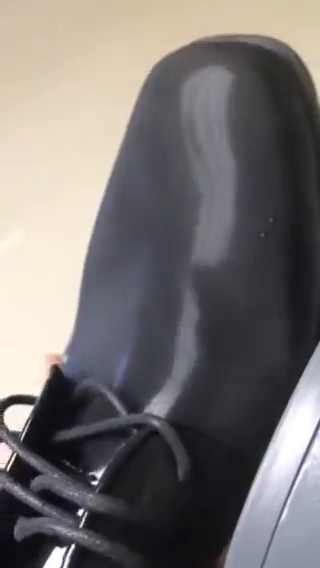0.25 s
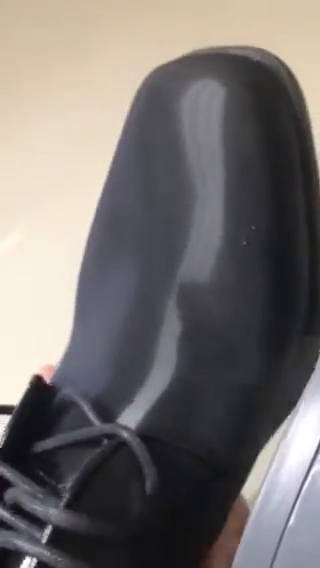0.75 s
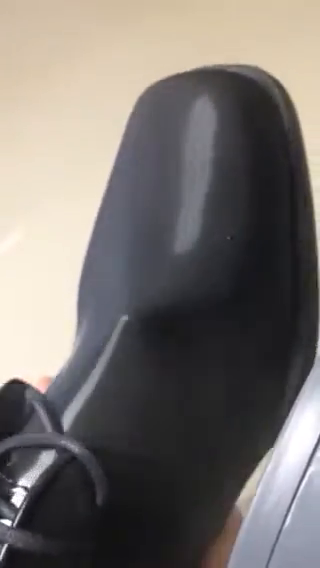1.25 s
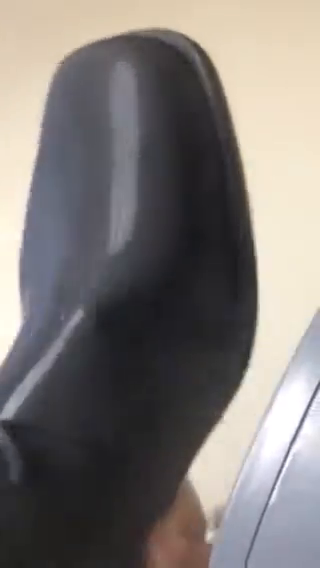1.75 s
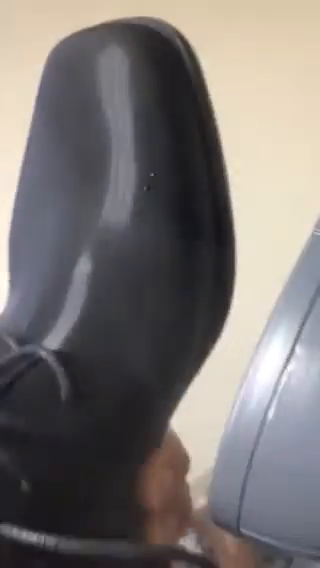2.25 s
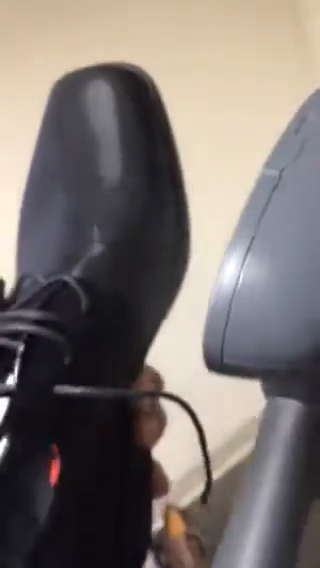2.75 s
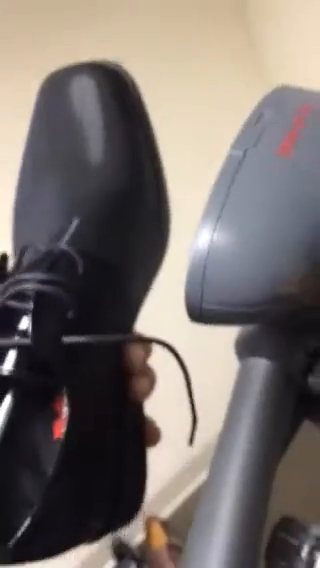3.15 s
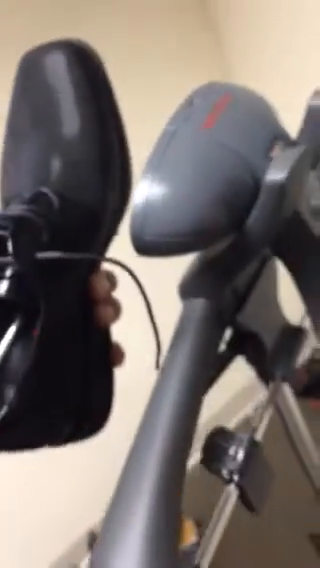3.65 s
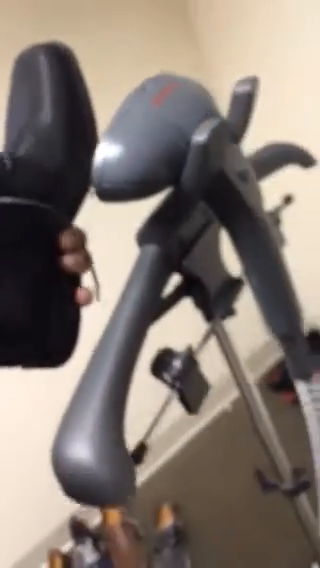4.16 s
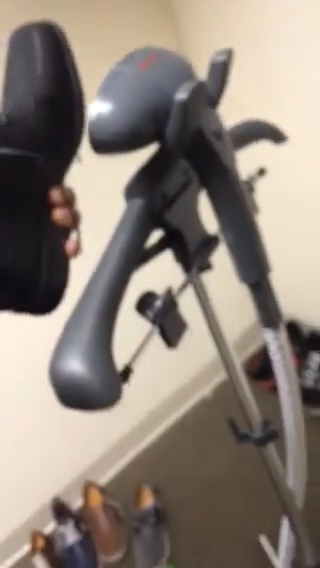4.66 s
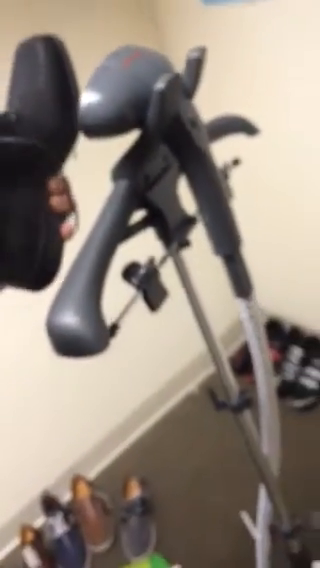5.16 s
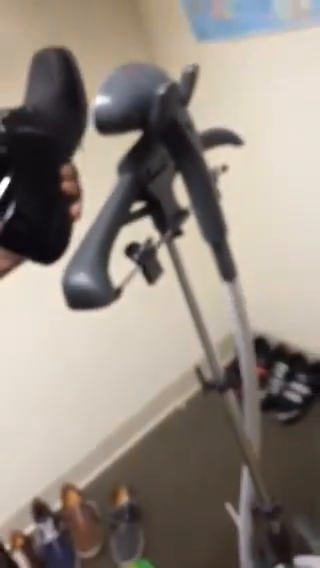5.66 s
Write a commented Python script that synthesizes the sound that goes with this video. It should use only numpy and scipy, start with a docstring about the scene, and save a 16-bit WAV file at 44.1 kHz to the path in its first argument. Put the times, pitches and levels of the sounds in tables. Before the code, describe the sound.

Wet steam rushes against a leather shoe with crackling spits and airy high whistling, growing quieter and more roomy as the microphone backs away.

```python
"""Small room, microphone a hand's width from a garment steamer blowing at a leather shoe.
At first wet steam sputters in the hollow head, surges and spits drops, while the jets hiss, splash on
the leather and catch in short breathy whistles: shaped noise, gliding resonances and short pulses.
Midway the shoe is drawn aside and screens the head for a moment. The microphone backs away, faster
towards the end, and the walls colour the steam. A small pump, a sum of harmonics, throbs underneath."""
import sys
import numpy as np
from scipy import signal
from scipy.fft import rfft, irfft, next_fast_len
from scipy.io import wavfile
from scipy.ndimage import uniform_filter1d, map_coordinates

SR = 44100
rng = np.random.default_rng(int(sys.argv[2]) if len(sys.argv) > 2 else 0)


def to_wav(s):
    """Save 16-bit WAV."""
    ch = np.atleast_2d(s).T  # columns
    pcm = np.round(np.clip(ch, -1, 1) * 32767)  # PCM
    wavfile.write(sys.argv[1], SR, pcm.astype(np.int16))


N = 261072

# Low rush, sputter and throat hiss of the head. Each row: frequency in Hz, relative level in dB.
RUSH_SPECTRUM = [(20, -42), (36, -33), (65, -8), (110, -5), (195, 2.5), (225, 0.5), (255, -6), (320, -1),
                 (420, -3.5), (560, 5.5), (750, -0.5), (1000, -6.5), (1600, -33)]
SPUTTER_SPECTRUM = [(500, -52), (780, -16), (930, -3), (1150, -5), (1400, 1), (1700, 1), (1900, 0),
                    (2100, -25), (2700, -54)]
THROAT_SPECTRUM = [(1700, -29.5), (2050, 3), (2450, 3), (3000, 2), (3500, 3), (3900, -1.5), (4150, -6),
                   (4700, -8)]
# How loud each stands at NEAR_M, before the room: level in dB, loss per doubling of distance in dB.
RUSH_LEVEL = (-52.5, 5)
SPUTTER_LEVEL = (-43, 6.5)
THROAT_LEVEL = (-39, 9.5)
# The room carries the throat's hiss at this base level however far the microphone goes.
THROAT_ROOM_DB = -58
# The hiss ends at a sharp upper edge. Each row: time in seconds, edge in Hz.
THROAT_EDGE = [(0, 4700), (.8, 4400), (1.4, 4380), (5.92, 4330)]
# The hollow note of the head. Each row: time in seconds, centre in Hz, base level in dB.
HOLLOW_NOTE = [(0, 1609, -52), (1.4, 1460, -49), (3.1, 1279, -56.5), (3.8, 1406, -49.5), (3.98, 1720, -52),
               (5.0, 1830, -50), (5.45, 2082, -57), (5.92, 2137, -66)]
# The throat's bright note sinks and fades as the head turns away.
# Each row: time in seconds, centre in Hz, base level in dB.
THROAT_NOTE = [(0, 3740, -50), (1.2, 3504, -53), (2.6, 3390, -72)]
# Narrow resonances of the plastic head. Each row: frequency in Hz, width in Hz, lift in dB.
HEAD_RESONANCES = [(397, 27, 5.5), (587, 60, -2), (690, 67, 1.5), (1106, 33, 4), (1170, 64, 4.5),
                   (1227, 45, 4), (1420, 48, 3), (1643, 65, 2.5), (2076, 150, 3)]
# The shoe passes between head and microphone: half-way in and half-way out in seconds, fade in seconds.
SHOE_SCREEN = (2.62, 3.26, 0.49)


def head(throat_surge=0.48, throat_screen_db=6):
    """Condensed water sputters in the steam path and rings the hollow head; the shoe screens its throat hiss."""
    surge_db = surging()
    screen = spell(*SHOE_SCREEN)
    # the same droplets and surges drive both low registers
    flicker = amp(0.97 * wobble(30))
    flow = wet_flow(per_second=300, spread_db=3, drop_share=0.33) * flicker
    rush = heard(RUSH_LEVEL, surge_db) * coloured(flow, RUSH_SPECTRUM)
    sputter = heard(SPUTTER_LEVEL, surge_db) * coloured(flow, SPUTTER_SPECTRUM)
    fine_flow = wet_flow(per_second=900, spread_db=-6.5, drop_share=0.16)
    direct = heard(THROAT_LEVEL, -throat_screen_db * screen)
    throat_gain = np.hypot(direct, amp(THROAT_ROOM_DB)) * amp(throat_surge * surge_db)
    throat = below_edge(throat_gain * coloured(fine_flow, THROAT_SPECTRUM), THROAT_EDGE)
    notes = gliding_note(HOLLOW_NOTE, width_hz=123) + gliding_note(THROAT_NOTE, width_hz=300)
    return resonant(rush + sputter + throat + notes, HEAD_RESONANCES)


# Surges of condensed water in the steam path.
# Each row: middle in seconds, length in seconds, lift in dB.
WATER_SURGES = [(1.26, 0.12, 1), (1.52, 0.55, 1.5), (2.047, 0.2, 3.5), (2.206, 0.14, 3), (2.61, 0.25, 3),
                (3.759, 0.19, 4.5), (4.3, 0.077, 1.5), (4.847, .06, 6), (4.993, 0.12, 4), (5.465, 0.13, 5),
                (5.621, 0.19, 3.5), (5.75, .07, 3)]


def surging():
    """Lift in dB from the surges of water, each a smooth swell."""
    t = np.arange(N) / SR
    return sum(db * np.exp(-(2 * (t - s) / length) ** 2) for s, length, db in WATER_SURGES)


def wet_flow(per_second, spread_db, drop_share):
    """Turbulence mixed with tiny bursting droplets of uneven size, drop_share of the power."""
    draws = rng.random(N)
    sizes = amp(spread_db * rng.uniform(-0.8, 1, N))
    share = np.clip(drop_share, 0, 1)
    droplets = unit((draws < per_second / SR) * sizes)
    turbulence = rng.standard_normal(N)
    return np.sqrt(share) * droplets + np.sqrt(1 - share) * turbulence


# Splash on the leather, hiss and fine mist. Each row: frequency in Hz, relative level in dB.
SPLASH_SPECTRUM = [(3600, -8.5), (4400, 1.5), (5000, 1.5), (6100, 1.5), (7000, -5), (9500, -11.5),
                   (12000, -37)]
HISS_SPECTRUM = [(5200, -24), (6500, -5), (7300, 0.5), (8300, 0), (9800, 1.5), (12000, -5), (13500, -17)]
MIST_SPECTRUM = [(9000, -20.5), (12000, -8), (13000, -10), (14300, -8), (15500, -13.5)]
# How loud each stands at NEAR_M, before the room: level in dB, loss per doubling of distance in dB.
SPLASH_LEVEL = (-51, 2.5)
HISS_LEVEL = (-47, 4.5)
MIST_LEVEL = (-46.5, 4)
# The jets strike the leather. Each row: start in seconds, end in seconds,
# lift of the splash in dB, of the hiss in dB, of the mist in dB.
LEATHER_STRIKES = [(.25, 1.24, 0, -0.5, 2.5), (1.23, 1.796, 7, 2, 1.5), (1.775, 2.355, 4.5, 4.5, 2.5),
                   (2.34, 2.715, 6, 4, 2.5), (2.72, 3.352, 3.5, 0.5, 3)]
STRIKE_FADE_S = 0.16
# The jets' airy edge tone glides, swells and fades as the shoe moves before the holes.
# Each row: time in seconds, centre in Hz, base level in dB.
EDGE_TONE = [(0, 11070, -47.5), (.55, 11250, -42.5), (1.17, 10610, -42), (1.35, 10640, -46),
             (1.62, 10700, -39.5), (1.8, 11000, -47), (1.95, 11000, -48), (2.15, 11000, -60),
             (2.65, 10950, -43.5), (3.05, 10470, -44), (3.28, 10700, -44.5), (3.4, 10740, -47),
             (3.64, 10900, -46.5), (3.88, 10900, -61), (4.15, 10900, -52.5), (4.68, 11080, -50),
             (4.88, 11030, -56.5), (5.15, 11000, -54), (5.5, 11060, -64)]
# Their lower, broader tone opens as the shoe clears the head.
# Each row: time in seconds, centre in Hz, base level in dB.
LOW_TONE = [(0, 7300, -60), (2.9, 6300, -53), (3.18, 6900, -59), (3.35, 7200, -50), (3.75, 7450, -49),
            (4.15, 7200, -56), (4.6, 6800, -59), (5.92, 7450, -58.5)]


def jets():
    """The jets hiss, splash on the leather and whistle at the edges of their holes."""
    splash_db, hiss_db, mist_db = sum(
        np.outer(lifts, spell(start, end, STRIKE_FADE_S)) for start, end, *lifts in LEATHER_STRIKES)
    splash = heard(SPLASH_LEVEL, splash_db) * coloured(rng.standard_normal(N), SPLASH_SPECTRUM)
    hiss = heard(HISS_LEVEL, hiss_db) * coloured(rng.standard_normal(N), HISS_SPECTRUM)
    mist = heard(MIST_LEVEL, mist_db) * coloured(rng.standard_normal(N), MIST_SPECTRUM)
    tones = gliding_note(EDGE_TONE, width_hz=480) + gliding_note(LOW_TONE, width_hz=680)
    flutter = amp(0.46 * wobble(21.93))
    return (splash + hiss + mist + tones + whistles()) * flutter


# A jet catches on the edge of its hole and whistles. Each row: start in seconds, end in seconds,
# pitch at the middle in Hz, glide in Hz per second, base level in dB.
JET_WHISTLES = [(1.257, 1.8, 12060, -150, -47.5), (2.283, 2.52, 12150, -3000, -48),
                (3.222, 4.016, 11900, 397.5, -54.5), (5.7, 6.1, 11700, 0, -60)]
WHISTLE_WIDTH_HZ, WHISTLE_FADE_S = 400, 0.043


def whistles():
    """Brief high whistles catch on the hole edges, hold or slide in pitch, and let go."""
    t = np.arange(N) / SR
    out = np.zeros(N)
    for start, end, hz, glide, db in JET_WHISTLES:
        pitch = hz + glide * (t - (start + end) / 2)
        envelope = amp(db) * np.sqrt(spell(start, end, WHISTLE_FADE_S))
        out += envelope * breathy_note(pitch, WHISTLE_WIDTH_HZ)
    return out


# Drops of water spat out of the holes. Each row: middle in seconds, base level in dB, pitch in Hz.
SPAT_DROPS = [(.059, -22.5, 1270), (.230, -19.5, 1140), (.413, -23.5, 1350), (.421, -36.5, 318),
              (.613, -18, 1360), (.717, -21, 1400), (.722, -41, 300), (.956, -21, 1460),
              (.998, -21.5, 1160), (1.110, -21.5, 1270), (1.231, -19.5, 1200), (1.258, -27, 1400),
              (1.273, -21.5, 1350), (1.312, -25, 1320), (1.444, -19, 1310), (1.535, -20, 1280),
              (1.665, -27.5, 896), (1.988, -30, 500), (2.025, -24, 1150), (2.232, -22, 1060),
              (2.484, -27, 1420), (2.5353, -18.5, 1140), (2.554, -39, 1300), (2.611, -27, 566),
              (2.653, -25, 1100), (2.785, -32, 1270), (2.910, -27, 1180), (3.104, -28, 1100),
              (3.117, -27, 1150), (3.530, -33, 1270), (3.704, -29, 1260), (3.764, -34, 1340),
              (3.879, -28.5, 955), (3.897, -28.5, 1210), (3.988, -33.5, 745), (4.280, -33, 1450),
              (4.306, -31, 1460), (4.946, -30, 1440), (5.469, -33, 1150), (5.672, -35, 1050)]


def spits(cycles=0.36, lean=0.59, ring_db=-15, ring_t60=0.038):
    """A drop bursts out of a hole: one push of pressure, a smaller pull and a brief ring."""
    out = np.zeros(N + SR)
    t = np.arange(-SR // 100, SR // 100) / SR  # the ring is cut off 10 ms after the push
    for s, db, hz in list(SPAT_DROPS) + random_drops():
        push = np.exp(-.5 * (t * hz / cycles) ** 2)
        ring = (t > 0) * amp(ring_db - 60 * np.abs(t) / ring_t60)
        burst = np.maximum(push, ring) * np.cos(2 * np.pi * hz * t + lean)
        start = round(s * SR) - len(t) // 2
        out[start:start + len(t)] += amp(db) * burst
    return out[:N]


# Further drops fall at random; their level is the one at NEAR_M.
DROPS_PER_S, DROP_DB, DROP_SPREAD_DB, DROP_HZ = 8.9, -33, -0.5, 1300


def random_drops(pitch_spread=0.46):
    """Random drops, fainter with distance: rows of seconds, level in dB, pitch in Hz."""
    count = int(DROPS_PER_S * N / SR)
    times = rng.uniform(0.022, N / SR - .02, count)
    size, pitch = rng.uniform(-1, 1, (count, 2)).T
    far_db = 20 * np.log10(np.interp(times, *np.transpose(MIC_DISTANCE)) / NEAR_M)
    levels = DROP_DB + DROP_SPREAD_DB * size - far_db
    return list(zip(times, levels, DROP_HZ * np.exp(pitch_spread * pitch)))


# Thin singing of the steam pipe. Each row: frequency in Hz, relative level in dB.
PIPE_TONES = [(3200, -3), (3440, -3.5), (3770, -0.5)]
# How loud it stands at NEAR_M: level in dB, loss per doubling of distance in dB.
SINGING_LEVEL = (-52.5, 3.5)


def singing(width_hz=40, screen_db=11, waver_hz=16, waver_db=1.5):
    """Steam in the pipe keeps narrow resonances alive, wavering in pitch and strength; the shoe screens them."""
    ring = np.zeros(N)
    for hz, db in PIPE_TONES:
        strength = amp(db + waver_db * wobble(5.14))
        ring += strength * breathy_note(hz + waver_hz * wobble(4), width_hz)
    return heard(SINGING_LEVEL, -screen_db * spell(*SHOE_SCREEN)) * unit(ring)


# A dip slides through the hiss as the shoe moves.
# Each row: time in seconds, centre in Hz, depth in dB (negative lifts).
SHOE_DIP = [(0, 5230, 3.5), (1.05, 4900, 3.5), (1.45, 4200, 4.5), (2.4, 4100, 3), (3.1, 3650, -1),
            (3.35, 4830, 4.5), (3.62, 5120, 6.5), (4.1, 5330, 3.5), (4.5, 5130, -0.5), (5.92, 5380, 6)]
# A narrower dip lower down climbs as the microphone backs away.
# Each row: time in seconds, centre in Hz, depth in dB.
LOW_DIP = [(0, 2300, 3), (2.6, 2000, 0), (3.4, 2200, 2), (3.9, 2380, 7), (4.7, 2910, 6), (5.2, 3250, 9),
           (5.7, 3730, 0)]


def drifting(x, patchy_db=1.5, dip_width_hz=450, low_dip_width_hz=270):
    """The colour of the steam shifts in soft patches and two sliding dips."""
    hz, t, z = signal.stft(x, SR, nperseg=512)
    field = rng.standard_normal(z.shape)
    field = uniform_filter1d(field, size=3, axis=0)
    field = uniform_filter1d(field, size=60, axis=1)
    # the patches reach full depth from 2 kHz up
    patches = patchy_db * unit(field) * np.clip(hz / 2000, 0, 1)[:, None]

    def dip(rows, width_hz):
        """Depth in dB of a bell-shaped dip, per frequency and time."""
        s, centre, depth = np.transpose(rows)
        offset = hz[:, None] - np.interp(t, s, centre)
        return np.interp(t, s, depth) * np.exp(-(offset / width_hz) ** 2)

    dips = dip(SHOE_DIP, dip_width_hz) + dip(LOW_DIP, low_dip_width_hz)
    return signal.istft(z * amp(patches - dips), SR, nperseg=512)[1][:N]


# Pump harmonics. Each row: multiple of the stroke rate, relative level in dB.
PUMP_HARMONICS = [(8, -15), (9, -4), (10, 0), (11, -10), (12, -5), (13, -6), (14, -9), (15, -10), (18, -16),
                  (24, -16)]
STROKE_HZ = 15
# The pump stands on the floor, so it grows as the microphone backs away; its level is the one at NEAR_M.
PUMP_DB, PUMP_GAIN_DB_PER_DOUBLING = -66, 3


def pump(first_s=.055, uneven_db=4.0, lag=0.31):
    """Regular piston strokes make a hum that throbs once a stroke."""
    turns = 2 * np.pi * STROKE_HZ * (np.arange(N) / SR - first_s)
    hum = np.zeros(N)
    for k, db in PUMP_HARMONICS:
        strength = amp(db + uneven_db * wobble(8.8))
        # the housing delays each harmonic a little differently
        hum += strength * np.cos(k * turns + lag * rng.standard_normal())
    return amp(PUMP_DB + PUMP_GAIN_DB_PER_DOUBLING * doublings()) * unit(hum)


# Peaks and notches that the walls add from afar. Each row: frequency in Hz, width in Hz, lift in dB.
WALL_RESONANCES = [(477, 43, -5.5), (630, 63, -17), (720, 126, 5.5), (1063, 34, 7), (1139, 62, -10),
                   (1250, 34, 7), (2890, 110, 8), (2355, 42, 8), (3100, 69, 6), (4100, 250, 5)]
WALLS_FROM_M, WALLS_FULL_M = 0.26, 0.64


def walls(x):
    """The further the microphone, the more the walls colour the steam."""
    share = np.clip((curves(MIC_DISTANCE)[0] - WALLS_FROM_M) / (WALLS_FULL_M - WALLS_FROM_M), 0, 1)
    return (1 - share) * x + share * resonant(x, WALL_RESONANCES)


def room(x, t60, wet_db, wet_db_per_doubling):
    """Near walls add a short, dense answer whose share grows with distance."""
    t = np.arange(SR // 2) / SR
    tail = rng.standard_normal(len(t)) * amp(-60 * t / t60) * (t > .003)
    wet = signal.fftconvolve(x, tail / np.linalg.norm(tail))[:N]
    share = amp(wet_db + wet_db_per_doubling * doublings())
    return (x + share * wet) / np.sqrt(1 + share ** 2)


# The quiet room itself. Each row: frequency in Hz, relative level in dB.
ROOM_SPECTRUM = [(22, -40), (38, -2), (65, -1), (105, -4), (195, 8), (255, -5), (480, -7), (800, 2),
                 (2000, -17), (15000, -20)]


def room_floor():
    """The steady noise of the room, random and shaped in frequency."""
    return amp(-64.0) * coloured(rng.standard_normal(N), ROOM_SPECTRUM)


# Microphone to nozzle. Each row: time in seconds, distance in metres.
MIC_DISTANCE = [(0, 0.16), (2.35, 0.23), (2.95, 0.31), (3.75, 0.41), (4.2, 0.46), (5.0, 0.68), (5.92, 0.82)]
NEAR_M = .2


def doublings():
    """How many times the distance to the nozzle has doubled from NEAR_M, per sample."""
    return np.log2(curves(MIC_DISTANCE)[0] / NEAR_M)


def heard(level, lift_db=0):
    """Gain over time of a part given as (near dB, loss per doubling dB)."""
    near_db, loss_db = level
    return amp(near_db - loss_db * doublings() + lift_db)


def spell(start, end, fade):
    """Fades in around start, holds at 1, fades out around end."""
    t = np.arange(N) / SR
    return np.clip(np.minimum(t - start, end - t) / fade + .5, 0, 1)


def breathy_note(centre_hz, width_hz):
    """Turbulence in one resonance whose centre glides."""
    def narrow(hz):
        return 1 / np.sqrt(1 + (hz / width_hz) ** 4)

    a, b = [filtered(noise, narrow) for noise in rng.standard_normal((2, N))]
    phase = 2 * np.pi * np.cumsum(centre_hz) / SR
    return unit(a * np.cos(phase) + b * np.sin(phase))


def gliding_note(rows, width_hz):
    """A breathy note that follows (s, centre Hz, level dB) rows."""
    centre_hz, db = curves(rows)
    return amp(db) * breathy_note(centre_hz, width_hz)


def resonant(x, bands):
    """x with narrow (Hz, width Hz, lift dB) peaks and notches."""
    def response(hz):
        return amp(sum(db / (1 + (2 * (hz - f) / w) ** 2) for f, w, db in bands))

    return filtered(x, response)


def below_edge(x, rows, width_hz=70):
    """x with everything above a sliding (s, Hz) edge cut away."""
    hz, t, z = signal.stft(x, SR, nperseg=512)
    edge = np.interp(t, *np.transpose(rows))
    keep = (1 - np.tanh((hz[:, None] - edge) / width_hz)) / 2
    return signal.istft(z * keep, SR, nperseg=512)[1][:N]


def coloured(x, spectrum):
    """x shaped by (Hz, dB) points, at rms 1."""
    f, db = np.transpose(spectrum)
    return unit(filtered(x, lambda hz: amp(np.interp(np.log(hz + 1), np.log(f), db))))


def filtered(x, response):
    """x with its spectrum multiplied by a response of frequency."""
    m = next_fast_len(N + SR // 2)
    return irfft(rfft(x, m) * response(np.fft.rfftfreq(m, 1 / SR)), m)[:N]


def wobble(rate):
    """A smooth random curve, rate knots a second."""
    knots = rng.standard_normal(int(N * rate / SR) + 4)
    return map_coordinates(knots, [np.arange(N) * rate / SR])


def curves(rows):
    """One value per sample for each column after the time."""
    s, *cols = np.transpose(rows)
    return [np.interp(np.arange(N) / SR, s, c) for c in cols]


def unit(x):
    """Scale to rms 1."""
    return x / np.sqrt(np.mean(np.abs(x) ** 2) + 1e-20)


def amp(db):
    """Decibels to gain."""
    return 10 ** (np.asarray(db) / 20)


def scene():
    """Steam, pump and the quiet room, alike in both channels."""
    floor = room_floor()
    steam = walls(drifting(head() + jets())) + singing()
    hum = pump()
    steam_in_room = room(steam + spits(), t60=0.19, wet_db=-12.5, wet_db_per_doubling=2)
    mono = steam_in_room + hum + floor
    return np.array([mono, mono])


LOW_CUT_HZ, TOP_HZ = 28, 15500


def record(dry):
    """The recorder cuts the deepest bass and keeps nothing above its band limit."""
    def band(hz):
        return (hz < TOP_HZ) * hz ** 4 / (hz ** 4 + LOW_CUT_HZ ** 4)

    return np.array([filtered(channel, band) for channel in dry])


dry = scene()
out = record(dry)
to_wav(out)
```